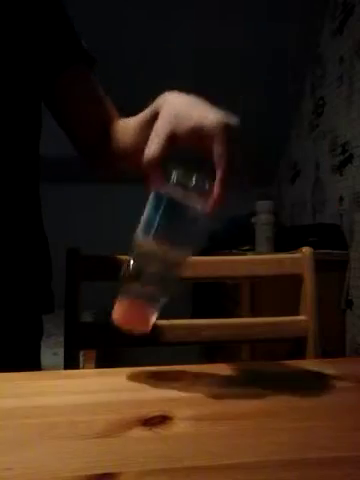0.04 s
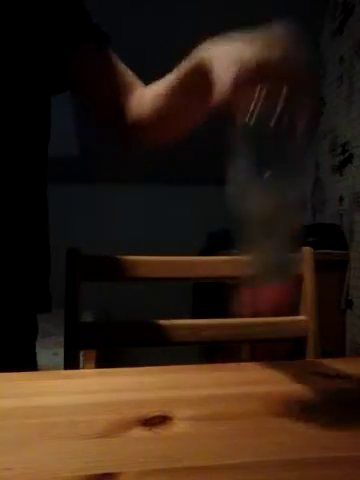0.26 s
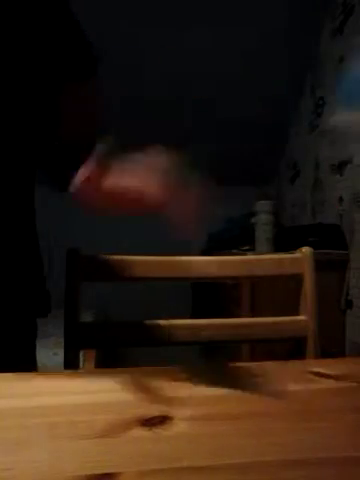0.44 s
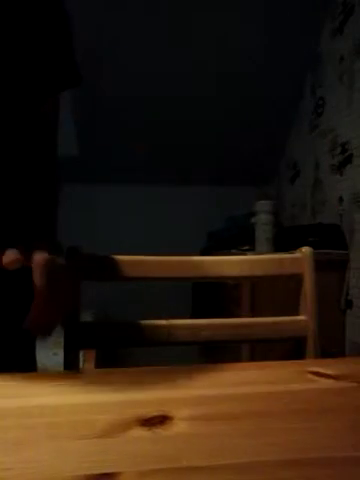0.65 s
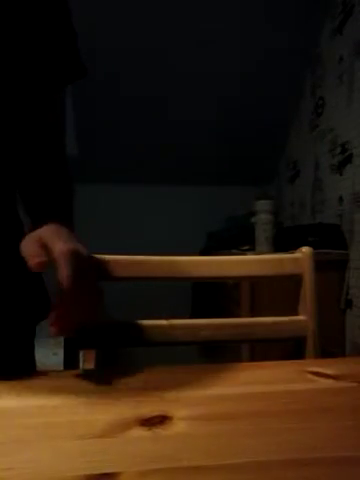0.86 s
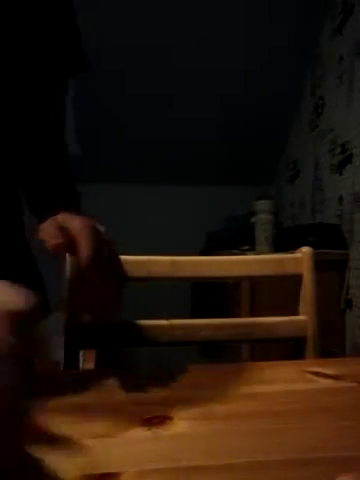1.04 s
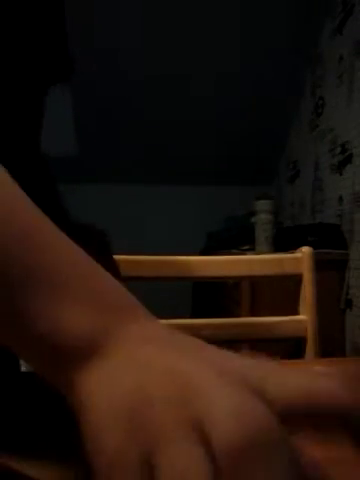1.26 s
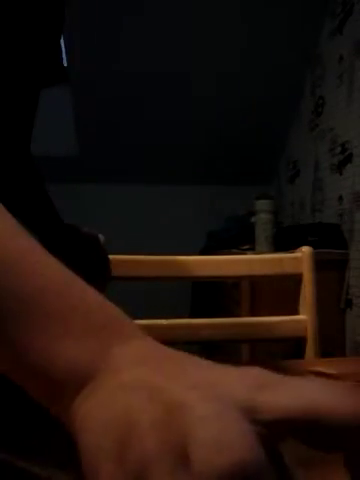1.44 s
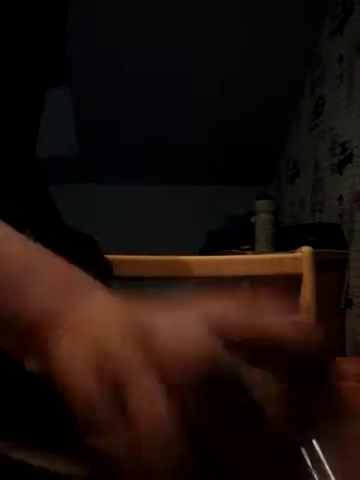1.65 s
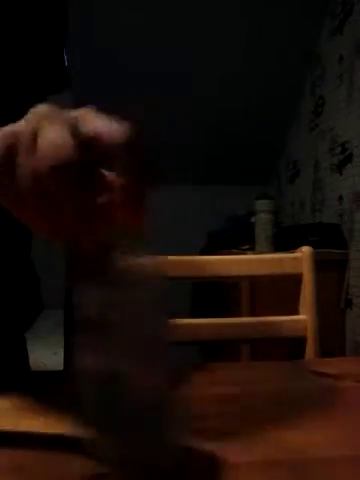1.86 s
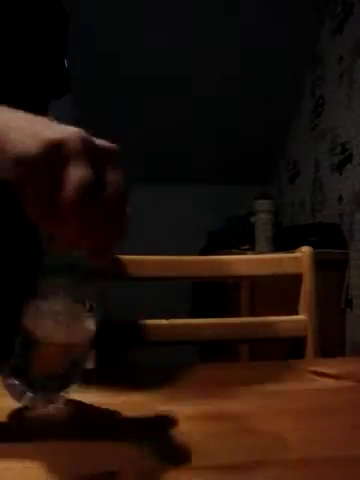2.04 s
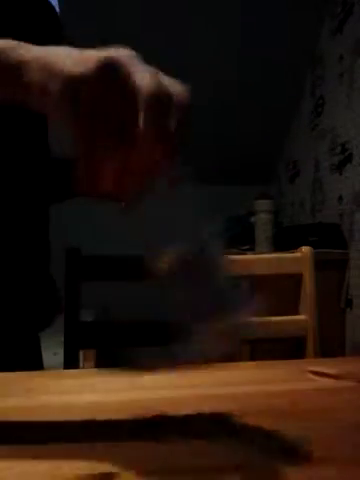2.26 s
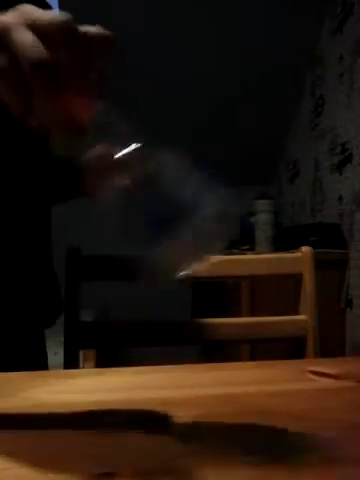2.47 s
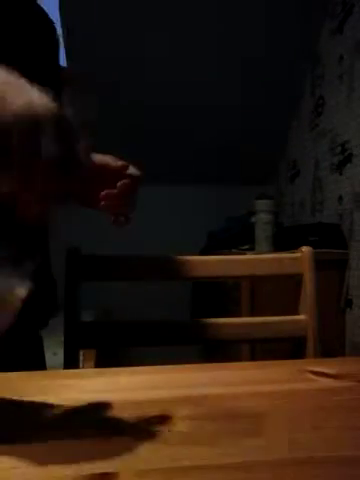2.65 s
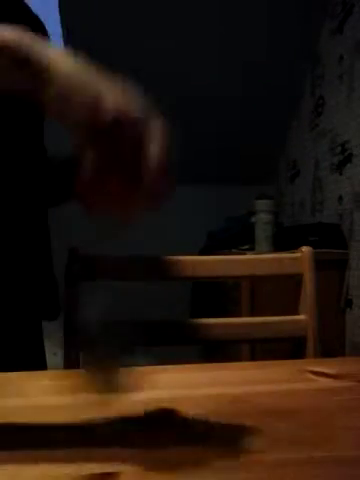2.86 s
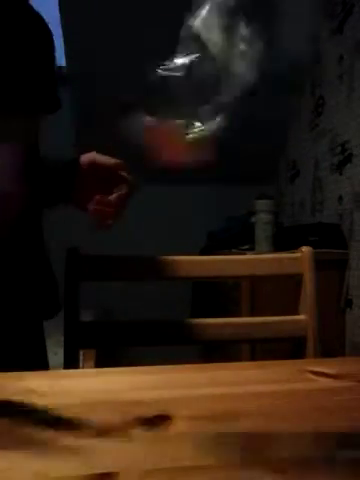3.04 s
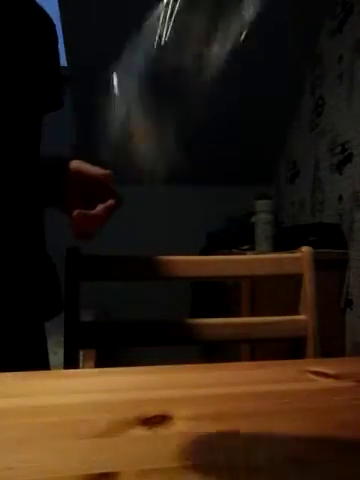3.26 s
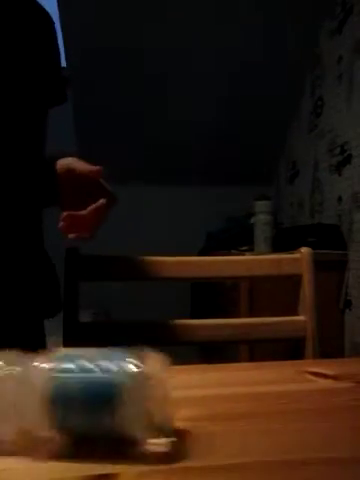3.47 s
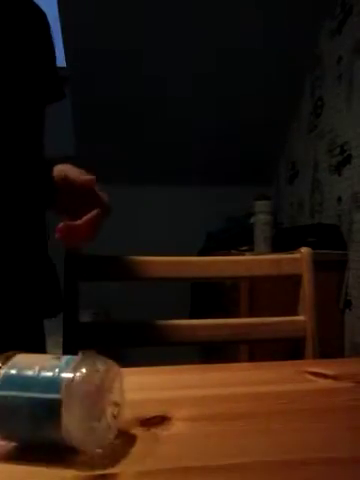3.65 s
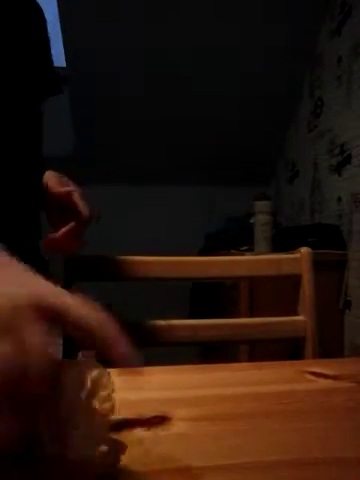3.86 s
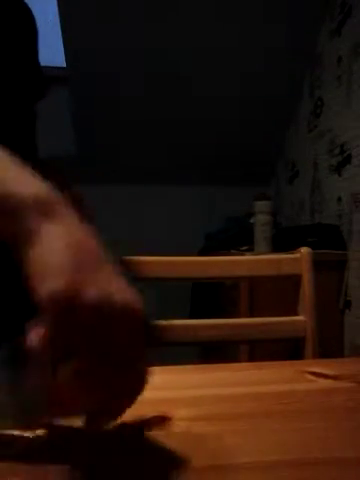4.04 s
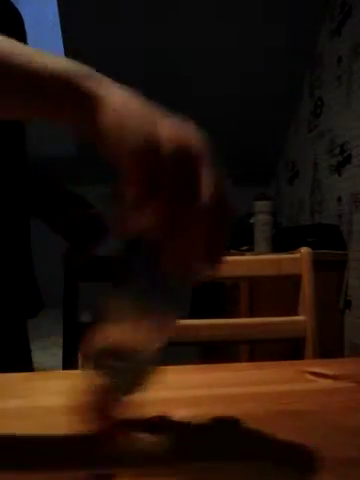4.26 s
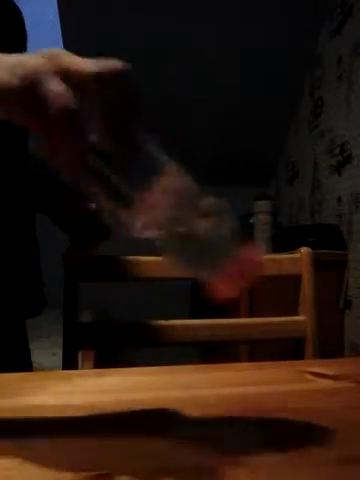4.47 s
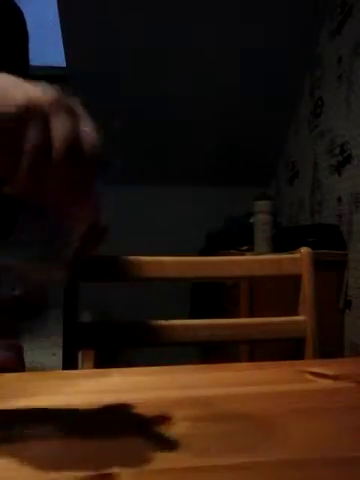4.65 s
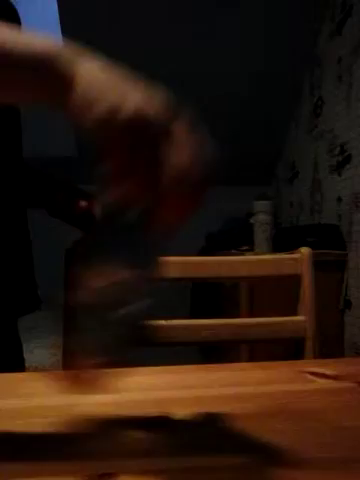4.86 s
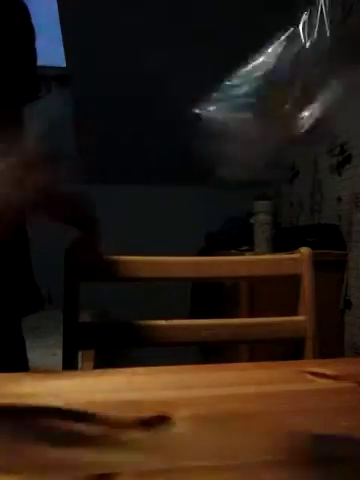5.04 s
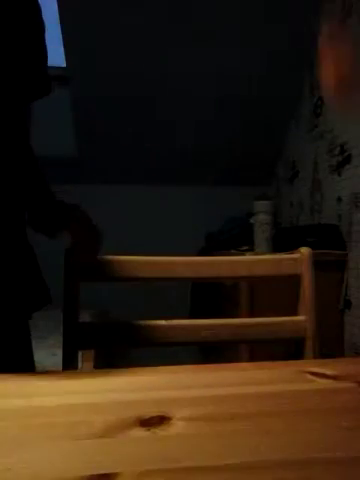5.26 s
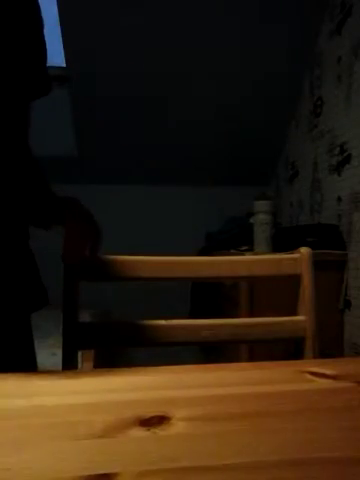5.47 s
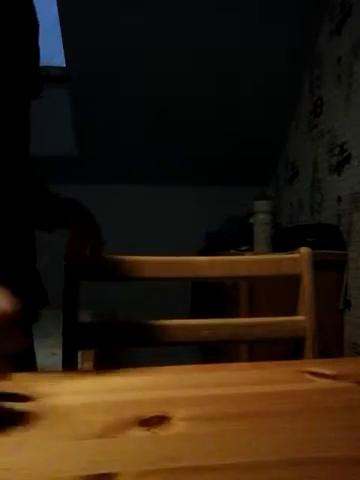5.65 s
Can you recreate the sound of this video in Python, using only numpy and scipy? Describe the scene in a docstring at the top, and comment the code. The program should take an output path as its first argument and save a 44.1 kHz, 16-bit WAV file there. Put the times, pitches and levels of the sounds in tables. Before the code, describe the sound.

Three loud, slightly distorted bottle slams boom through a wooden tabletop in a quiet room, with small water ticks, knocks and plastic rubbing between them.

```python
"""In a small room a partly filled plastic bottle is flipped three times onto a wooden table.
It slams down, topples, rolls and is grabbed again: blows ring decaying modes and noise bands of the table.
Shell crackle and skin rub are filtered clicks; the splashing water is many short rising sine bubbles.
The phone on the same table rattles in dry ticks and its microphone overloads."""
import sys
import numpy as np
from scipy import signal
from scipy.fft import rfft, irfft
from scipy.io import wavfile

SR = 44100
rng = np.random.default_rng(int(sys.argv[2]) if len(sys.argv) > 2 else 0)


def waveform_to_disk(signal):
    """Save audio, clipped to [-1, 1], as 16-bit WAV at the path in sys.argv[1]."""
    frames = np.transpose(np.atleast_2d(signal))
    scaled = np.clip(frames, -1, 1) * 32767
    samples = np.round(scaled).astype(np.int16)
    wavfile.write(sys.argv[1], SR, samples)


N = 251811
TIME = np.arange(N) / SR
RING_TIME = TIME[:2 * SR // 3]

# All dB levels are relative; source gains follow in the functions. t60 is the time to decay by 60 dB.
# The bottle slams down, shell first and water after. Each row: start in seconds, shell knock in dB,
# water lag in seconds, water knock in dB, water's low thump in dB, low wall ring in Hz, its dB,
# high wall ring in Hz, its dB, air ring in Hz, its dB.
LANDINGS = [(0.6611, -0.5, .017, -3, -27, 257, -11, 955, -22, 588, -26),
            (3.3743, -11.5, .008, -2.5, -7.5, 309.1, -9, 1344, -14.5, 714, -30.5),
            (5.3678, 0, .0144, -4.5, -21, 280, -28, 846, -10.5, 564.4, -20.5)]
# Bare shell on wood; the thump is relative to the shell's knock.
SLAM_BRIGHT_HZ, SLAM_CRACK_DB, SLAM_CLATTER_S = 3300, -16, 0.022
SLAM_THUMP_DB, SLAM_RING_FACTOR = -22, 1.048
# The water's weight follows.
WATER_BRIGHT_HZ, WATER_CRACK_DB, WATER_CLATTER_S, WATER_RING_FACTOR = 1890, -25, 0.023, 0.85
# Lighter knocks of bottle and hand. Each row: start in seconds, knock in dB, low thump in dB,
# shell crack in dB, clatter time constant in seconds.
KNOCKS = [(0.6366, -21, -23.5, -24, 0.024), (1.067, -55, -38.5, -61, 0.011),
          (1.1612, -32.5, -21, -49, 0.011), (1.2245, -26.5, -24, -30, 0.0082),
          (1.261, -22, -27.5, -24, 0.0037), (1.579, -28, -26.5, -49, 0.0074),
          (1.8905, -21, -14.5, -31, 0.0066), (1.902, -17.5, -26.5, -29, .019),
          (3.477, -10, -9.5, -11, 0.0041), (3.943, -38.5, -25.5, -51, 0.051),
          (4.047, -28, -29, -44.5, .005), (4.075, -26.5, -28.5, -62, 0.0089)]
KNOCK_BRIGHT_HZ, KNOCK_RING_FACTOR = 850, 0.63  # softer contact, damped by hand or water
# The toppled bottle rocks to rest: gaps lengthen, each bump is weaker.
ROCK_START_S, ROCK_GAP_S, ROCK_GAP_GROWTH = 3.518, 0.058, 1.2
ROCK_FALL_DB, ROCK_CLATTER_S = 7.5, 0.014
ROCK_KNOCK_DB, ROCK_THUMP_DB, ROCK_CRACK_DB = -18.5, -13.5, -27
# Table frame and table top. Each row: nominal pitch in Hz, level in dB, t60 in seconds before the ring factor.
FRAME_MODES = [(83, -8.5, 0.46), (110, -1.5, 0.4), (125.4, -1.5, 0.49), (133.4, -3.5, 0.46),
               (178.5, -4.5, 0.31), (208.3, -2.5, 0.59)]
TOP_MODES = [(213.7, -19, 0.94), (265.6, 4, 0.4), (307.6, -1, 0.48), (340.9, -13, 0.26),
             (428.6, -10.5, 0.27), (449.6, 4.5, .35), (513, -6, 0.42), (562, 0.5, 0.33), (649.6, 1.5, 0.18),
             (710, -11.5, 0.31), (765, -16.5, 0.17), (833, -9.5, 0.48), (891, -12, 0.51), (1106, -4, 0.32),
             (1258, -10, 0.55), (1404, -9, 0.13), (1537, -13.5, 0.23), (1872, -13, 0.16),
             (2000, -14.5, 0.58), (2184, -20, 0.57)]
# Dense ring of wood and bottle. Each row: frequency in Hz, density in dB per Hz,
# t60 in seconds before the ring factor.
WOOD_RING = [(100, -9, 0.058), (215, -7, 0.35), (280, -2, .5), (500, 0, 0.53), (900, -6, 0.46),
             (1580, -8.5, 0.46), (2520, -11.5, 0.32), (4670, -21, 0.41), (9150, -21, 0.15),
             (16000, -32.5, 0.18)]
# Colour of shell crackle. Each row: frequency in Hz, density in dB per Hz.
SHELL_SPECTRUM = [(200, -20), (900, -12), (2200, -3), (3800, -5.5), (7000, -7), (10000, -11),
                  (16000, -11.5)]
# Walls ringing on where a knock catches them free. Each row: start in seconds, pitch in Hz, level in dB,
# t60 in seconds.
KNOCK_RINGS = [(1.262, 307, -37, 0.87), (1.579, 588, -32, 0.16), (1.892, 447, -29, 0.1),
               (1.893, 2070, -33.5, 0.23)]
# A hard landing rocks the table on its legs. Each row: start in seconds, level in dB.
SWAYS = [(3.378, -30), (5.369, -29.5)]
# The phone bouncing on the wood. Each row: start in seconds, level in dB.
RATTLES = [(0.6682, -3), (0.6838, 5), (1.2239, -7), (1.265, 3), (3.3781, 1.5), (3.3899, 11.5),
           (3.414, -0.5), (3.4802, -3), (3.491, -8), (3.522, -12), (5.391, 0.5), (5.3999, -5)]
BOUNCE_GAP_S, BOUNCE_FALL_DB = 0.005, 14
# Rolling after each landing: a list of level curves. Each row: time in seconds, level in dB.
ROLL_CURVES = [
    [(0.9, -46), (0.934, -35), (1.02, -46.5), (1.15, -44)],
    [(3.7, -43.5), (3.744, -49), (3.814, -50.5), (3.93, -52.5)],
    [(5.56, -26), (5.568, -35), (5.66, -32), (5.71, -22.5)],
]
# Dragging over the wood before being lifted. Each row: time in seconds, level in dB.
DRAG_CURVE = [(4.06, -45.5), (4.164, -28.5), (4.174, -37), (4.212, -36.5), (4.262, -66), (4.44, -63.5)]
# Colour of the rolling bumps. Each row: frequency in Hz, density in dB per Hz.
ROLLING_SPECTRUM = [(60, -29), (130, -12.5), (280, -18.5), (430, -12), (600, -2), (720, 4.5), (900, -0.5),
                    (1500, -9), (2300, -16), (4000, -21), (16000, -35)]
# Air in the lying bottle. Each row: nominal pitch in Hz, level in dB, t60 in seconds.
AIR_MODES = [(562, 16, 0.8), (679, 3.5, 0.68), (1120, 5.5, 0.55), (1230, 6, 1)]
# Each throw flicks off the fingers and sets the water sloshing. Each row: flick in seconds, flick in dB,
# slosh delay in seconds, slosh length in seconds, slosh in dB, first bubble pitch in Hz.
TOSSES = [(0.356, -44, 0.044, 0.13, -44.5, 9000), (3.003, -43.5, .135, 0.087, -55, 3600),
          (4.997, -41.5, .043, 0.15, -56, 8420)]
FLICK_RISE_S, FLICK_FALL_S = 0.01, 0.02
POOL_HZ = 2300  # centre of bubble pitch at the end of a slosh
GULP_HZ, GULP_DB = 684, -7  # big air pocket; level against the spray
GULP_PART = 0.25  # share of the slosh's time and pitch range the gulps keep to
# Drops slapping the inside of the lifted or flying bottle. Each row: start in seconds, level in dB, pitch in Hz.
DRIPS = [(0.402, -25, 6650), (0.4263, -17.5, 7440), (0.4432, -16, 7210), (0.495, -27, 4610),
         (0.5348, -22.5, 6150), (2.0842, -37, 3980), (3.1052, -22.5, 8290), (3.2078, -26.5, 7360),
         (3.2794, -36, 10020), (5.0895, -21, 7420), (5.1015, -17.5, 7140), (5.13, -25.5, 7140),
         (5.1782, -21.5, 8000)]
# The thin shell snapping as it is gripped or rolls. Each row: start in seconds, level in dB,
# panel pitch in Hz, decay time constant in seconds.
CRINKLES = [(0.953, -38, 4840, 0.011), (1.434, -30, 2720, 0.0018), (1.4746, -34, 3530, .0036),
            (1.639, -34.5, 5130, 0.014), (1.7117, -27, 5760, 0.0059), (1.741, -34, 6500, .004),
            (1.8654, -33, 9900, 0.0016), (2.268, -39.5, 4100, .005), (3.651, -31.5, 6860, 0.0013),
            (4.159, -39, 6950, .002), (4.275, -34.5, 5900, .005), (4.63, -50, 10000, 0.0017)]
# The gripped shell creaking as it is lifted. Each row: strongest moment in seconds, level in dB,
# rise in seconds, fall in seconds.
CREAKS = [(1.53, -54.5, 0.22, 0.011), (4.215, -35, 0.026, 0.012)]
# Fingers rubbing the plastic during each grab. Each row: time in seconds, level in dB.
FIRST_GRAB = [(1.28, -38), (1.424, -53), (1.43, -42.5), (1.542, -40), (1.552, -49), (1.628, -39),
              (1.644, -34.5), (1.666, -42), (1.744, -30.5), (1.776, -46), (1.85, -49)]
SECOND_GRAB = [(3.84, -58.5), (3.934, -45.5), (4.034, -56), (4.044, -44), (4.068, -54), (4.224, -44.5),
               (4.256, -45), (4.266, -43.5), (4.312, -38), (4.44, -61.5)]
# Brief shifts of the fingers. Each row: strongest moment in seconds, level in dB, half length in seconds.
SHIFTS = [(1.223, -44.5, 0.019), (2.142, -68, 0.12), (2.523, -66.5, 0.036), (4.698, -67.5, 0.049)]
# Colour of skin on plastic. Each row: frequency in Hz, density in dB per Hz.
SKIN_SPECTRUM = [(100, -11.5), (700, 10.5), (1300, 1), (2200, 6), (3500, -8), (6500, 3.5), (10000, -5.5),
                 (16000, -7.5)]
# Room echo. Each row: frequency in Hz, density in dB per Hz, t60 in seconds.
ROOM_ECHO = [(100, 10.5, 0.82), (1000, 3, 0.22), (4130, 1, 0.38), (7350, 1.5, 0.22), (10500, -1.5, 0.42),
             (16200, 2, 0.33)]
# Colour of still indoor air. Each row: frequency in Hz, density in dB per Hz.
QUIET_SPECTRUM = [(25, -30), (65, -23), (160, -15.5), (250, -19.5), (500, -24.5), (1000, -34), (3500, -42),
                  (7000, -36.5), (10000, -41), (16000, -44.5)]
# Faint hum. Each row: pitch in Hz, rms level in dB.
HUM = [(64.6, -78.5), (172.3, -66), (301.5, -74)]
PORT_HZ, PORT_Q, PORT_GAIN = 7060, 3.8, 3.12  # microphone port
TOP_HZ = 16000


def contacts(rock_count=4):
    """List all blows: s, knock dB, thump dB, crack dB, brightness Hz, clatter s, ring factor."""
    out = []
    for s, shell_db, lag_s, water_db, thump_db, *_ in LANDINGS:
        out.append((s, shell_db, shell_db + SLAM_THUMP_DB, SLAM_CRACK_DB,
                    SLAM_BRIGHT_HZ, SLAM_CLATTER_S, SLAM_RING_FACTOR))
        out.append((s + lag_s, water_db, thump_db, WATER_CRACK_DB,
                    WATER_BRIGHT_HZ, WATER_CLATTER_S, WATER_RING_FACTOR))
    for s, knock_db, thump_db, crack_db, clatter_s in KNOCKS:
        out.append((s, knock_db, thump_db, crack_db, KNOCK_BRIGHT_HZ, clatter_s, KNOCK_RING_FACTOR))
    s = ROCK_START_S
    for k in range(rock_count):
        lost_db = k * ROCK_FALL_DB
        out.append((s, ROCK_KNOCK_DB - lost_db, ROCK_THUMP_DB - lost_db, ROCK_CRACK_DB - lost_db,
                    KNOCK_BRIGHT_HZ, ROCK_CLATTER_S, KNOCK_RING_FACTOR))
        s += ROCK_GAP_S * ROCK_GAP_GROWTH ** k
    return out


def blows(mode_db=-1, wood_db=-6, contact_db=5, contact_t60_s=0.046, swell_share=0.35):
    """Each blow rings frame and top, while the shell buckles in a burst of cracks."""
    table, shell = np.zeros(N), np.zeros(N)
    # extra level before the blow has spread through the boards
    contact = 1 + undb(contact_db) * fade(contact_t60_s)
    crack_time = RING_TIME[:SR // 4]
    for s, knock_db, thump_db, crack_db, bright_hz, clatter_s, ring_factor in contacts():
        top = undb(mode_db) * modes(TOP_MODES, ring_factor, detune=0.0031)
        top += undb(wood_db) * contact * dense_ring(WOOD_RING, ring_factor)
        # softer contact is duller
        top = signal.lfilter(*signal.butter(1, min(bright_hz, SR / 3), fs=SR), top)
        swell = 1 - np.exp(-RING_TIME / (swell_share * clatter_s))
        frame = swell * modes(FRAME_MODES, ring_factor, detune=0.027)
        add(table, s, undb(knock_db) * top + undb(thump_db) * frame)
        cracks = grains(len(crack_time), spread_db=4.5) * np.exp(-crack_time / clatter_s)
        add(shell, s, undb(crack_db) * colour(cracks, SHELL_SPECTRUM))
    return table, shell


def bottle_rings(rise_share=0.03, low_t60_s=0.5, high_t60_s=0.29, air_t60_s=1.2):
    """Wall and air ring after a blow, pitched by how the water lies; longer rings build more slowly."""
    out, rings = np.zeros(N), list(KNOCK_RINGS)
    for s, _, lag_s, _, _, low_hz, low_db, high_hz, high_db, air_hz, air_db in LANDINGS:
        rings.append((s + lag_s, low_hz, low_db, low_t60_s))
        rings.append((s, high_hz, high_db, high_t60_s))
        rings.append((s + lag_s, air_hz, air_db, air_t60_s))
    for s, hz, db, t60_s in rings:
        build = np.tanh(RING_TIME / (rise_share * t60_s))
        add(out, s, undb(db) * fade(t60_s) * np.sin(2 * np.pi * hz * RING_TIME) * build)
    return out


def sway(hz=48, t60_s=0.13):
    """A deep, quickly damped swing of the whole table."""
    out = np.zeros(N)
    for s, db in SWAYS:
        add(out, s, undb(db) * fade(t60_s) * np.sin(2 * np.pi * hz * RING_TIME))
    return out


def rattles(ring_hz=7200, ring_s=0.00038, tick_s=0.00068, tick_db=-9, count=3):
    """Hard, dry ticks of the phone's case, each followed by weaker bounces."""
    out, t = np.zeros(N), RING_TIME[:SR // 50]
    ring = 0.5 * np.sin(2 * np.pi * ring_hz * t) * np.exp(-t / ring_s)
    for s, db in RATTLES:
        for k in range(count):
            tick = undb(tick_db) * rng.standard_normal(len(t)) * np.exp(-t / tick_s)
            add(out, s + k * BOUNCE_GAP_S, undb(db - k * BOUNCE_FALL_DB) * (tick + ring))
    return out


def rolls(roll_db=-8, drag_db=-4, mode_db=-3, air_db=0, drag_air_db=-1):
    """The ribbed bottle bumps along the grain and keeps the table top and the air inside it ringing."""
    bumps = colour(grains(N, spread_db=2.0), ROLLING_SPECTRUM)
    top_ring = modes(TOP_MODES, ring_factor=0.92, detune=0.002)
    wood = bumps + undb(mode_db) * unit(signal.fftconvolve(bumps, top_ring)[:N])
    air_ring = modes(AIR_MODES, ring_factor=1.0, detune=0.0023)
    air = unit(signal.fftconvolve(bumps, air_ring)[:N])
    roll_strength = sum(follow(curve) for curve in ROLL_CURVES)
    rolling = undb(roll_db) * roll_strength * (wood + undb(air_db) * air)
    dragging = undb(drag_db) * follow(DRAG_CURVE) * (wood + undb(drag_air_db) * air)
    return rolling + dragging


def water(glide=0.3, size_db=14, gulp_share=0.12, rate_per_s=500, decay_cycles=4, scatter=0.55):
    """Small rising bubbles, larger as the water gathers, with a few low gulps among them."""
    out, t = np.zeros(N), RING_TIME[:SR // 16]
    for s, _, delay_s, length_s, db, first_hz in TOSSES:
        for when, pitch, size, kind in rng.random((int(rate_per_s * length_s), 4)):
            if kind < gulp_share:  # the big air pocket moves first
                centre_hz, kind_db = GULP_HZ, GULP_DB
                when, pitch = when * GULP_PART, 0.5 + GULP_PART * (pitch - 0.5)
            else:
                centre_hz, kind_db = first_hz + (POOL_HZ - first_hz) * when, 0
            hz = centre_hz * np.exp(scatter * (2 * pitch - 1))
            age = hz * t / decay_cycles
            rise = 1 + glide * np.tanh(age / 2) / 2
            bubble = np.sin(2 * np.pi * hz * t * rise) * np.exp(-age)
            add(out, s + delay_s + when * length_s, undb(db + kind_db + size_db * size ** 2) * bubble)
    return out


def drips(gain_db=-14, length_s=0.0019, q=1.9, broad_db=-12):
    """Each drop ticks against the thin wall."""
    out = np.zeros(N)
    for s, db, hz in DRIPS:
        add(out, s, undb(db + gain_db) * snap(hz, length_s, q, broad_db))
    return out


def crinkles(broad_db=-8, q=1.02):
    """Each snap rings the panel that dents."""
    out = np.zeros(N)
    for s, db, hz, length_s in CRINKLES:
        add(out, s, undb(db) * snap(hz, length_s, q, broad_db))
    return out


def snap(hz, length_s, q, broad_db):
    """A short run of clicks ringing one panel of the shell."""
    t = RING_TIME[:SR // 8]
    clicks = grains(len(t), spread_db=2)
    panel = unit(resonate(resonate(clicks, hz, q), hz, q))
    return (panel + undb(broad_db) * clicks) * np.exp(-t / length_s)


def creaks(hz=2300, q=1.36):
    """Quick stick-slip ringing one wall of the shell."""
    slips = grains(N, spread_db=5)
    return strokes(CREAKS) * unit(resonate(resonate(slips, hz, q), hz, q))


def rubs(flick_db=-3, first_db=-8, second_db=-8, trail_db=-17, trail_lag_s=0.22, trail_s=0.061, crackle_db=-4):
    """Micro-slips of skin on plastic and crackles of the squeezed shell; a soft rustle trails each throw."""
    size = SR // 170  # samples per grip step
    grip = undb(4.5 * np.repeat(rng.standard_normal(N // size + 1), size)[:N])
    slips = unit(grip * grains(N, spread_db=4))
    crackle = grains(N, spread_db=7, size=64)
    flicks = strokes([(s, db + flick_db, FLICK_RISE_S, FLICK_FALL_S) for s, db, *_ in TOSSES])
    rustle = strokes([(s + trail_lag_s, db + trail_db, trail_s, trail_s) for s, db, *_ in TOSSES])
    grabs = undb(first_db) * follow(FIRST_GRAB) + undb(second_db) * follow(SECOND_GRAB)
    shifts = strokes([(s, db, half_s, half_s) for s, db, half_s in SHIFTS])
    texture = colour(slips, SKIN_SPECTRUM) + undb(crackle_db) * colour(crackle, SHELL_SPECTRUM)
    return (flicks + rustle + grabs + shifts) * texture


def room_echo(x, build_s=0.005):
    """Echo of the room: a dense ring of unit energy that builds up quickly."""
    echo = dense_ring(ROOM_ECHO) * np.tanh(RING_TIME / build_s)
    return signal.fftconvolve(x, echo / np.linalg.norm(echo))[:N]


def room_tone(air_db=-63):
    """Still indoor air as coloured noise, with a faint hum of steady sines."""
    hum = sum(undb(db) * np.sqrt(2) * np.sin(2 * np.pi * hz * (TIME + rng.random())) for hz, db in HUM)
    return undb(air_db) * colour(rng.standard_normal(N), QUIET_SPECTRUM) + hum


def undb(db):
    """Decibels to gain."""
    return 10 ** (np.asarray(db) / 20)


def unit(x):
    """Scale to rms 1."""
    return x / np.sqrt(np.mean(x ** 2) + 1e-20)


def add(track, s, sound):
    """Mix a sound into a track at time s."""
    start = int(round(s * SR))
    part = sound[:N - start]
    track[start:start + len(part)] += part


def fade(t60_s):
    """Free exponential decay of a ringing thing."""
    return np.exp(-np.log(1000) * RING_TIME / t60_s)


def modes(table, ring_factor, detune):
    """Struck modes of alternating sign; the bottle's weight shifts each pitch a little at random."""
    shifts = 1 + detune * rng.standard_normal(len(table))
    out = 0
    for k, (hz, db, t60_s) in enumerate(table):
        tone = np.sin(2 * np.pi * hz * shifts[k] * RING_TIME)
        out = out + (-1) ** k * undb(db) * fade(ring_factor * t60_s) * tone
    return out / np.linalg.norm([undb(db) for _, db, _ in table])


def dense_ring(points, ring_factor=1):
    """Countless overlapping modes: noise in bands half an octave apart, each with its own decay."""
    hz = np.fft.rfftfreq(len(RING_TIME), 1 / SR)
    random_phase = np.exp(2j * np.pi * rng.random(len(hz)))
    noise = rfft(unit(irfft(random_phase * undb(at_hz(hz, points)))))
    out = 0
    for centre_hz in 2 ** np.arange(6, 14.6, 0.5):
        band = np.maximum(1 - 2 * np.abs(np.log2((hz + 1) / centre_hz)), 0)
        out = out + irfft(noise * band) * fade(ring_factor * at_hz(centre_hz, points, axis=2))
    return out


def grains(count, spread_db, size=32):
    """Dense tiny clicks of uneven strength, each size samples long; rms 1."""
    steps = np.repeat(rng.standard_normal(count // size + 1), size)[:count]
    return unit(rng.standard_normal(count) * undb(spread_db * steps))


def strokes(table):
    """Strength of a movement that swells and fades with each stroke."""
    out = 0
    for s, db, rise_s, fall_s in table:
        width_s = np.where(TIME < s, rise_s, fall_s)
        out = out + undb(db) * np.exp(-((TIME - s) / width_s) ** 2)
    return out


def follow(curve, edge_s=0.028):
    """Strength along a curve of seconds and dB, fading out past its ends."""
    times, db = np.array(curve, float).T
    outside = TIME - np.clip(TIME, times[0], times[-1])
    return undb(np.interp(TIME, times, db)) * np.exp(-(outside / edge_s) ** 2)


def at_hz(hz, points, axis=1):
    """Read one column of a spectrum on a log-frequency axis."""
    table = np.array(points, float)
    return np.interp(np.log(np.maximum(hz, 1)), np.log(table[:, 0]), table[:, axis])


def colour(x, points):
    """Causal minimum-phase filter with the given spectrum and unit energy."""
    size = 4096
    half = size // 2
    cepstrum = irfft(np.log(undb(at_hz(np.fft.rfftfreq(size, 1 / SR), points))))
    causal = 2 * cepstrum[:half] * (np.arange(half) > 0)
    response = irfft(np.exp(rfft(causal, size)))
    return signal.oaconvolve(x, response / np.linalg.norm(response))[:len(x)]


def resonate(x, hz, q):
    """One resonance, gain 1 at its centre."""
    return signal.lfilter(*signal.iirpeak(min(hz, 0.4 * SR), max(q, 0.9), SR), x)


def scene(echo_db=-3, crinkle_db=-4, shell_db=-2, close_echo_db=-4):
    """Airborne sounds echo, those close to the phone less; table ring and rattles reach it directly."""
    table, shell = blows()
    air = undb(shell_db) * shell + creaks() + rolls() + water()
    close = undb(crinkle_db) * crinkles() + drips() + rubs()
    room = undb(echo_db) * room_echo(air + undb(close_echo_db) * close)
    near = air + close + room + table + sway() + bottle_rings() + rattles()
    # the microphone's port rings in the treble
    port = PORT_GAIN * resonate(near, PORT_HZ, PORT_Q)
    return (near + port + room_tone())[None]


def record(dry, knee=6, low_cut_hz=35, ceiling=0.69):
    """The microphone sheds the deepest bass and flattens the loudest swings; the top is cut."""
    lean = signal.lfilter(*signal.butter(2, low_cut_hz, "high", fs=SR), dry)
    flat = lean / (1 + np.abs(lean / ceiling) ** knee) ** (1 / knee)
    return signal.fftconvolve(flat, signal.firwin(161, TOP_HZ, fs=SR)[None], "same")


dry = scene()
out = record(dry)
waveform_to_disk(out)
```